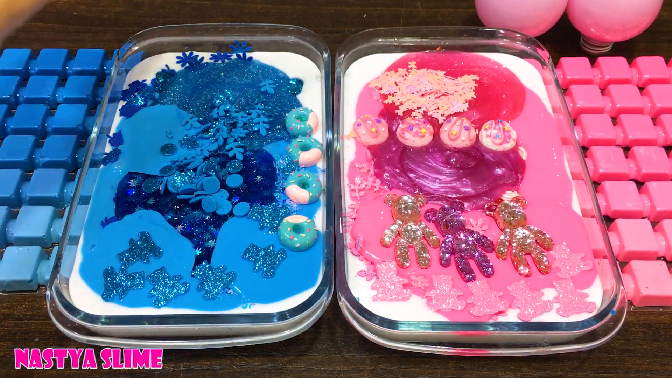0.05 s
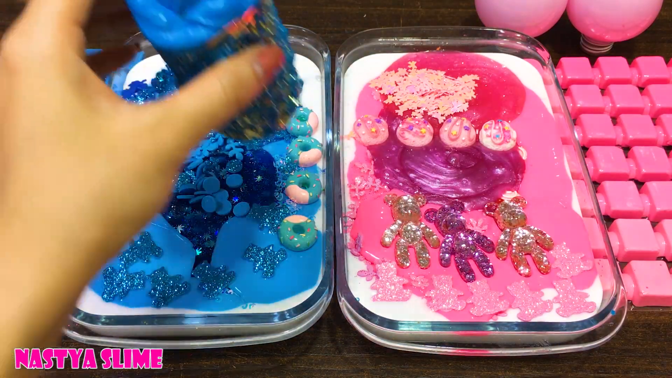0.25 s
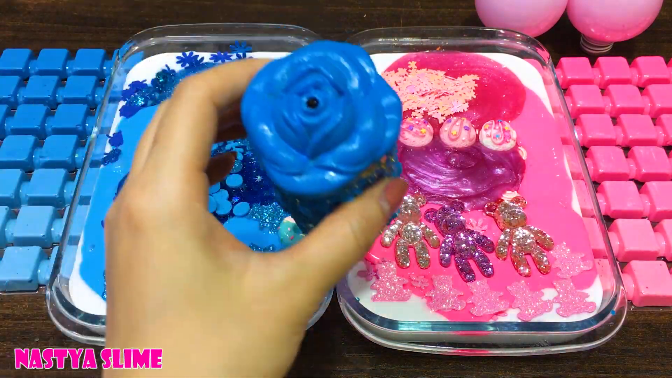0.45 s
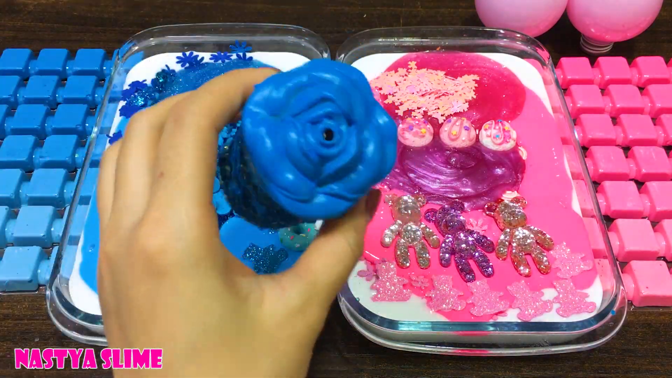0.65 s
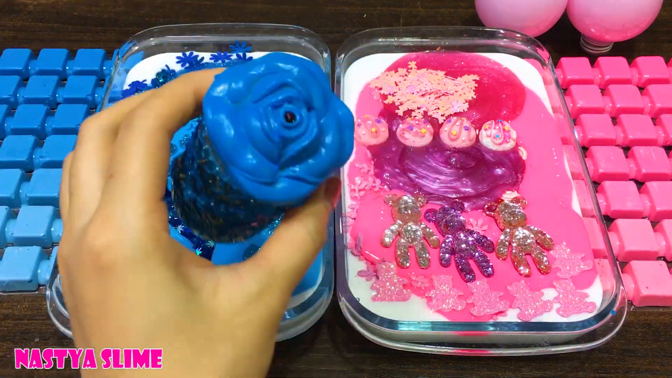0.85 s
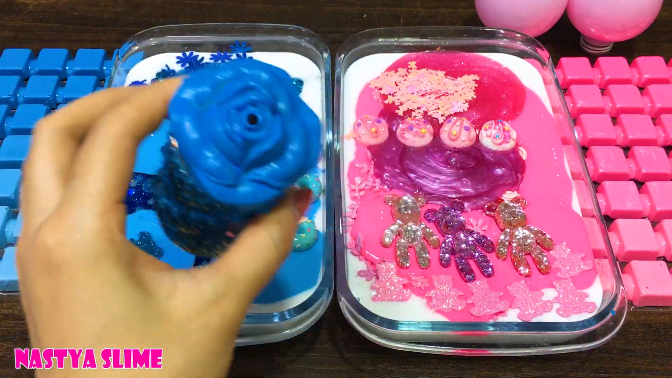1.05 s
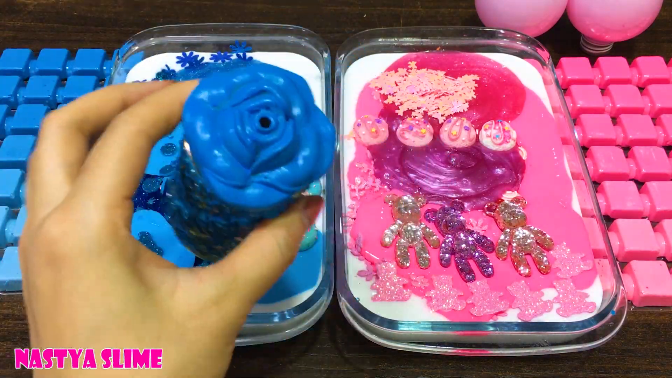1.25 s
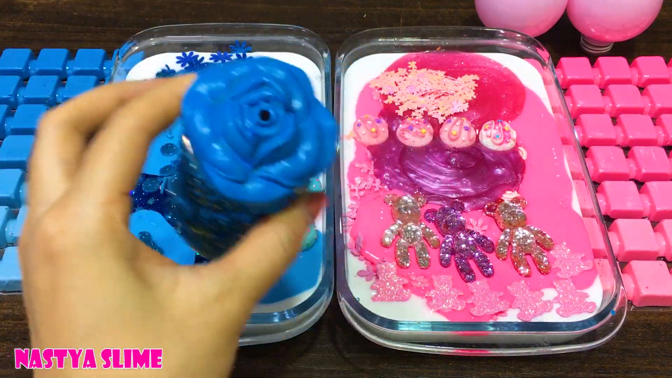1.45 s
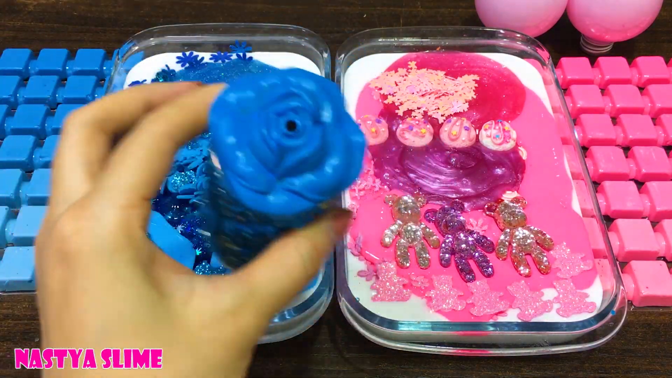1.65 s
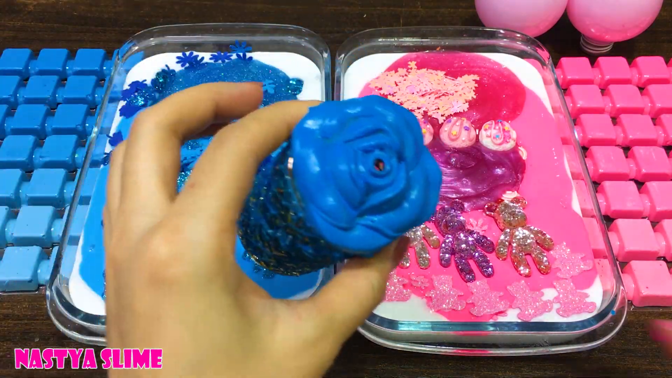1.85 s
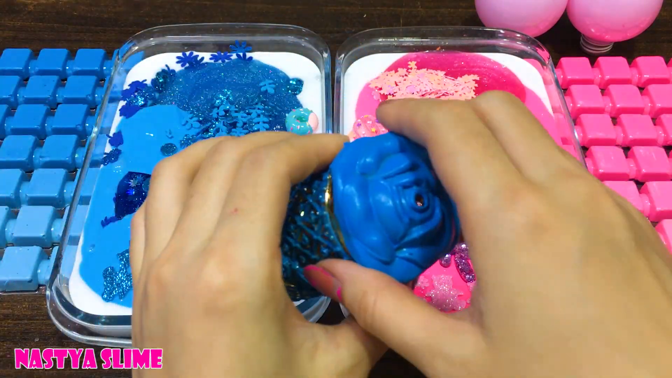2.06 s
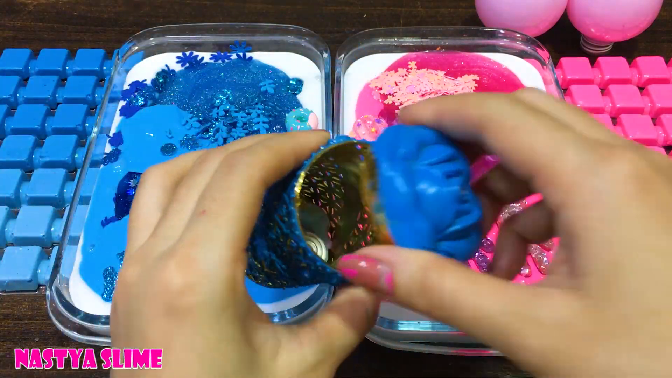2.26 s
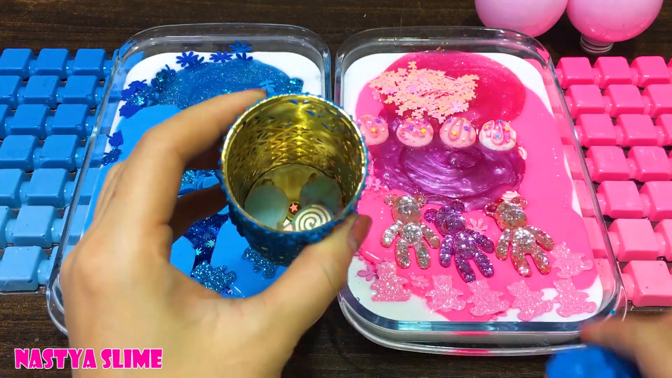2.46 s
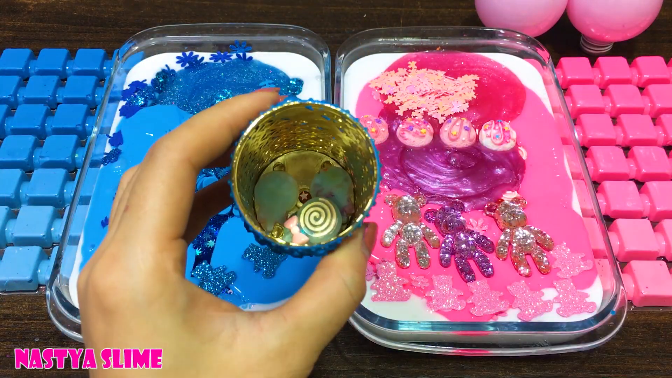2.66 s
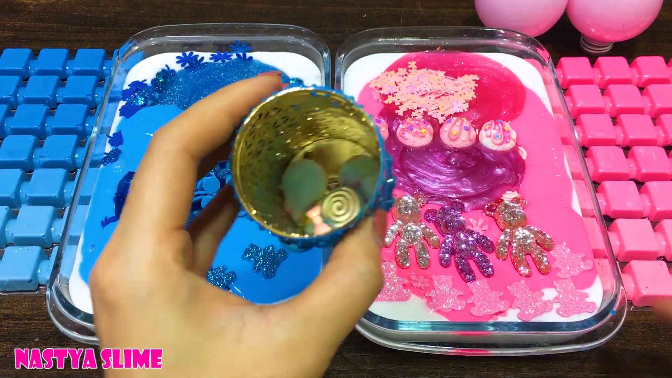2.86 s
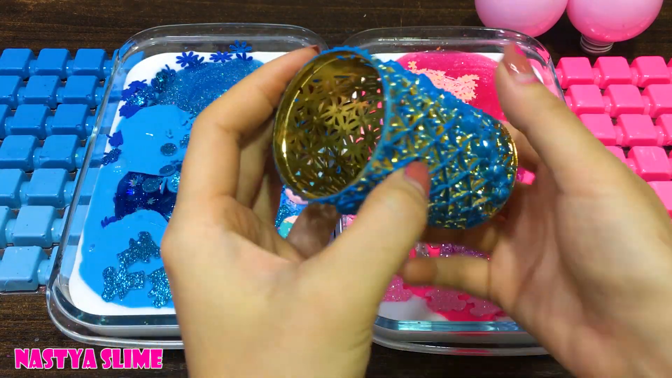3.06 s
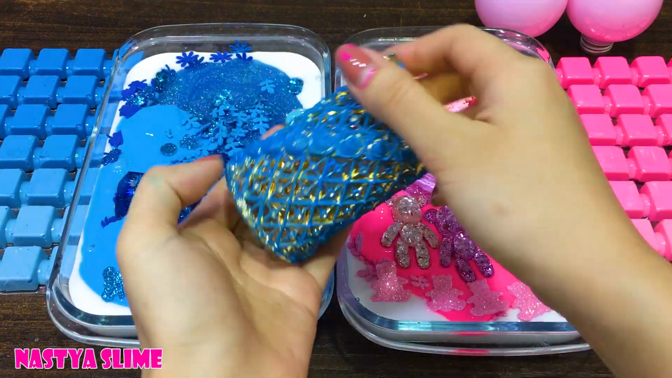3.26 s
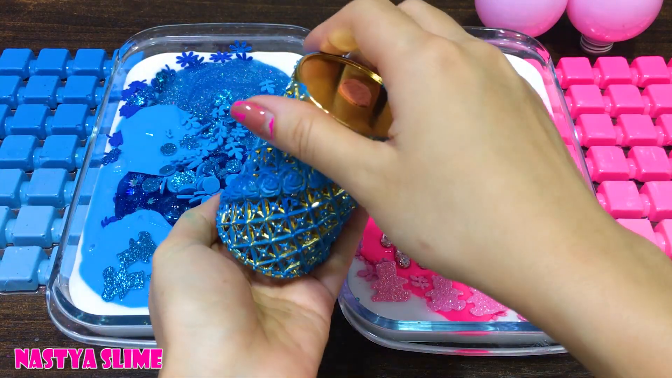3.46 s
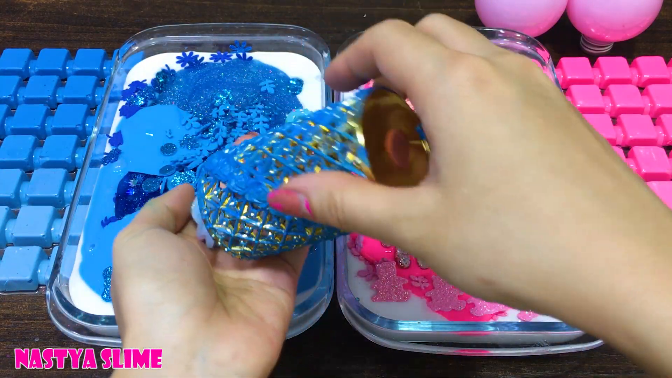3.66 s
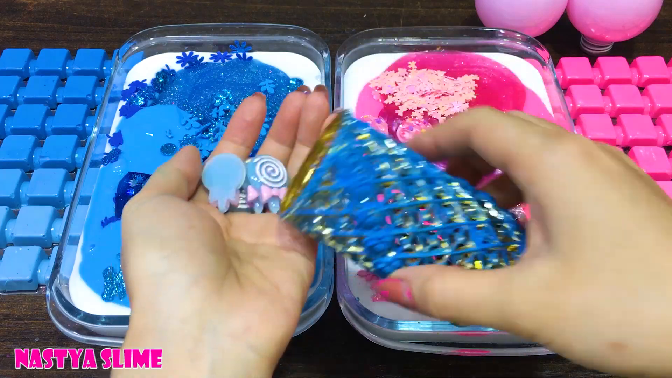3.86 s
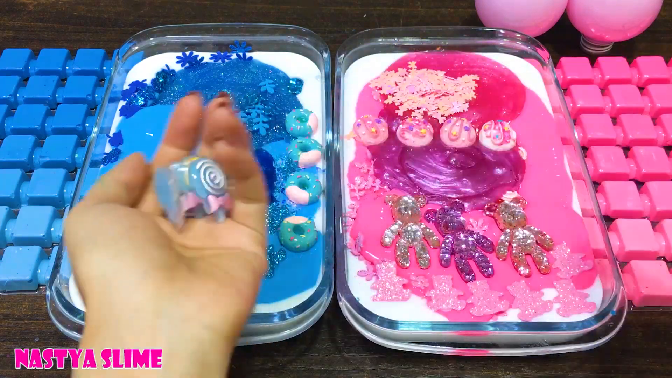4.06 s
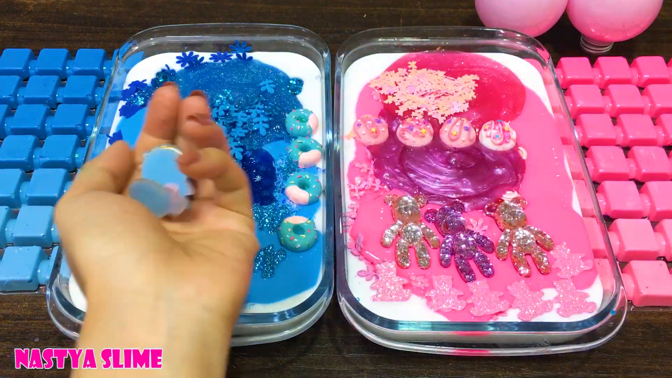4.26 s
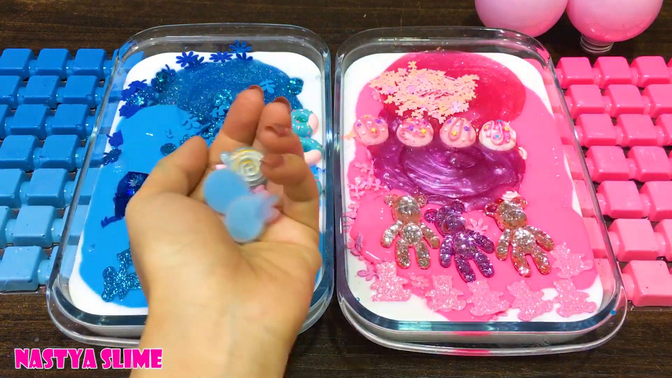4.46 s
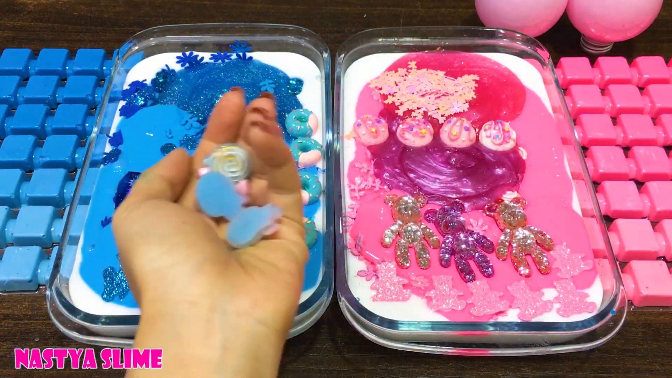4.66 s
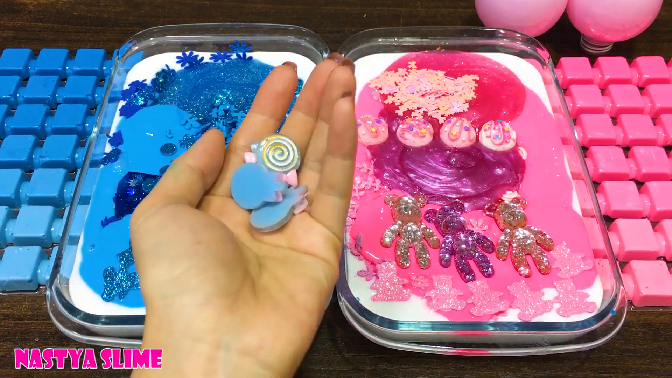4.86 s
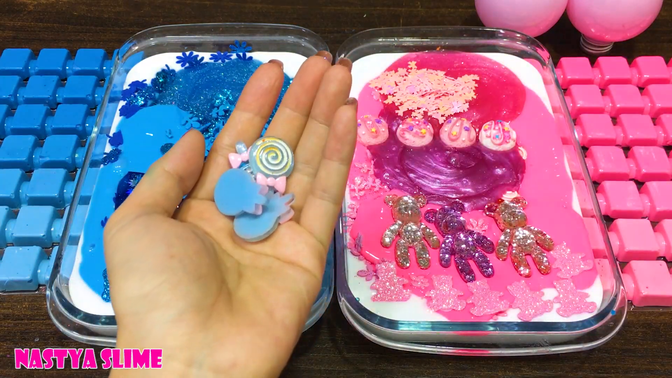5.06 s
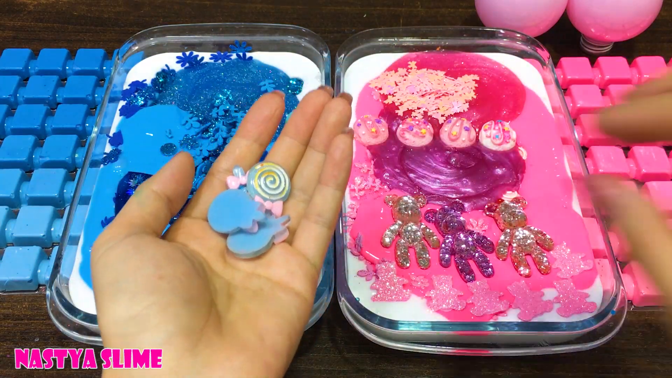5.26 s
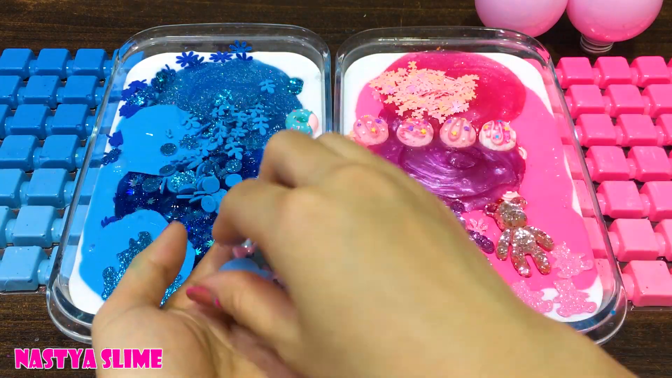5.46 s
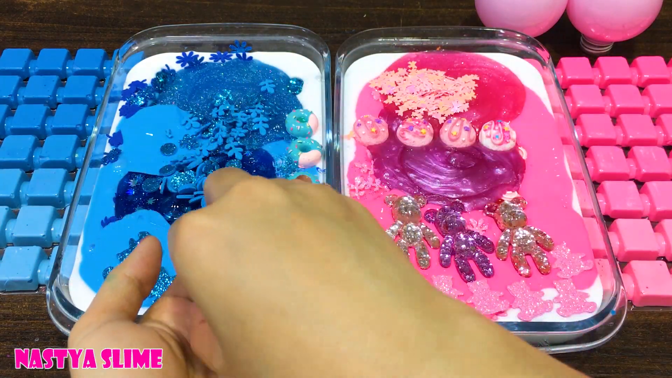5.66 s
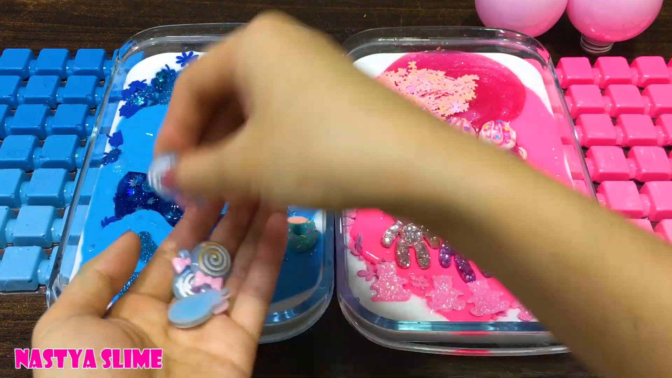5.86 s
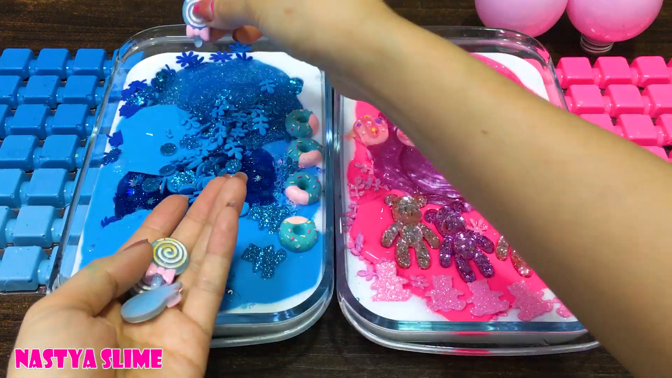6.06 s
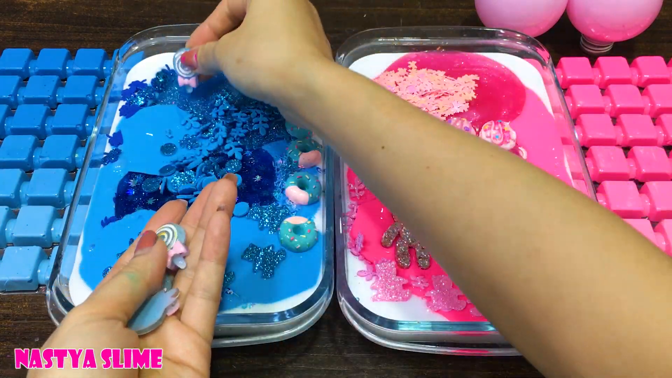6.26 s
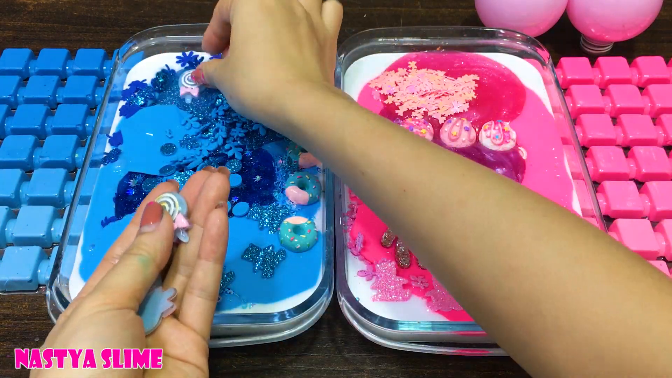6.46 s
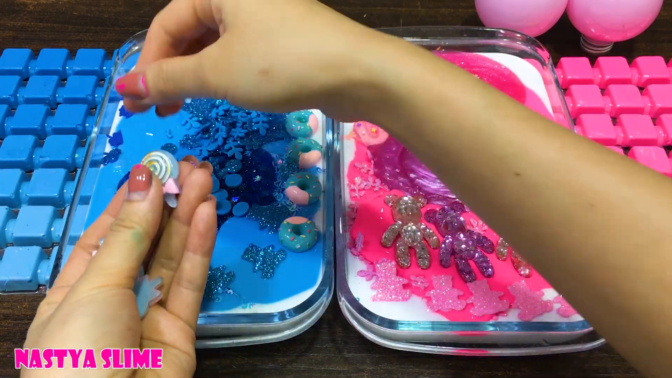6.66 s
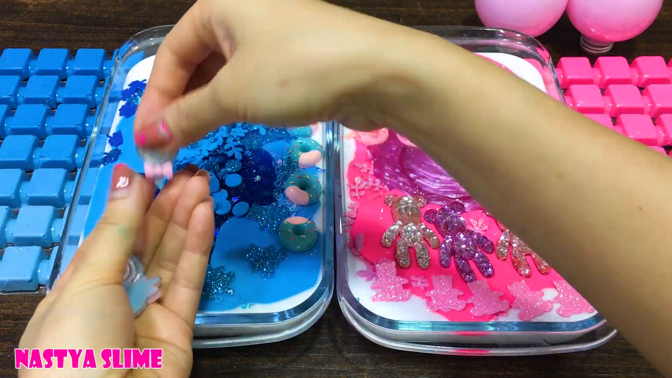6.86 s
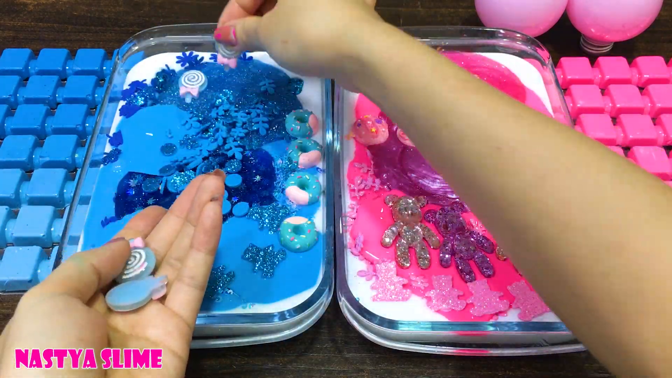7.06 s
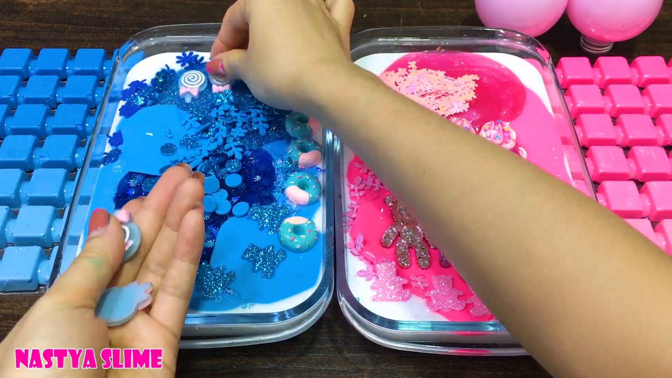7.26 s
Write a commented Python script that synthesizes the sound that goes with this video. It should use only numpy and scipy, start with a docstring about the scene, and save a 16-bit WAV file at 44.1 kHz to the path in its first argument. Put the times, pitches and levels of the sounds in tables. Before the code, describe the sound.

Brisk, hollow plastic shaking, a quiet lid removal, a few knocks, then crisp little charm clicks in a hand, fading to near-silent room noise.

```python
"""Small quiet room: a few plastic charms are shaken in a small lidded plastic cup, the lid comes off,
they are poured into a palm, jostled there and picked out one by one. Every collision rings the hollow cup,
its wall and the charms as decaying sines for a few milliseconds, with weak patter and dull thuds around it.
The room answers in shaped noise, over a low rumble and microphone hiss."""
import sys
import numpy as np
from scipy import signal
from scipy.fft import rfft, irfft
from scipy.io import wavfile

SR = 44100
rng = np.random.default_rng(int(sys.argv[2]) if len(sys.argv) > 2 else 0)


def pcm_store(signal):
    """Save signal as 16-bit PCM."""
    levels = np.round(np.clip(np.atleast_2d(signal), -1, 1) * 32767)
    wavfile.write(sys.argv[1], SR, levels.astype(np.int16).T)


N = 322900

# Background spectrum: (frequency [Hz], relative density [dB per Hz])
AIR_SPECTRUM = [(15, -56.5), (25, -22), (42, -15), (87, -2.5), (114, -10), (252, -19), (746, -28),
                (809, -27.5), (1550, -32), (2900, -32), (3700, -35.5), (5200, -33.5), (6500, -38.5),
                (7800, -33.5), (11500, -37), (13200, -40), (14800, -37.5), (16500, -48)]
# Swell of the rumble: (time [s], gain [dB])
RUMBLE_GAIN = [(0, 4), (.8, -2), (3.5, 0.5), (6.1, 2.5), (6.6, -5.5), (7.3, 1.9)]
# Clearest collisions: (time [s], peak of hollow knock [dB], peak of charm tick before its low cut [dB])
CLEAR_HITS = [(0.535, -39, -49), (0.5415, -34.5, -39.5), (0.58, -41.5, -47.5), (0.637, -38.5, -33.5),
              (0.6743, -29, -25), (0.9386, -48, -62.5), (1.0066, -25.5, -19.5), (1.0229, -26, -32.5),
              (1.035, -18.5, -16), (1.0771, -15, -20.5), (1.084, -29, -13), (1.0889, -8.5, -10.5),
              (1.106, -13.5, -19), (1.1098, -8.5, -11.5), (1.12, -10.5, -8.5), (1.125, -6.5, -4),
              (1.1399, -15, -14.5), (1.1464, -17, -22.5), (1.196, -14, -12.5), (1.198, -9.5, -14),
              (1.204, -16, -11), (1.2155, -5, -7.5), (1.2288, -13, -14), (1.2506, -21, -11.5),
              (1.267, -16, -17.5), (1.2884, -30.5, -8.5), (1.2957, -14, -10), (1.3024, -15, -17),
              (1.3114, -13.5, -9), (1.3685, -15, -9), (1.3833, -8.5, -3.5), (1.3942, -16, -6),
              (1.4012, -15, -9), (1.4177, -16, -21.5), (1.457, -17, -7.5), (1.4769, -10.5, -7.5),
              (1.5058, -15, -7), (1.515, -15.5, -18.5), (1.5273, -20.5, -5), (1.5465, -11.5, -32),
              (1.5687, -10, -13.5), (1.5806, -12.5, -10.5), (1.585, -13.5, -15), (1.592, -7.5, -4.5),
              (1.6079, -18.5, -8), (1.618, -16.5, -5), (1.6259, -10, -20.5), (1.642, -19, -10),
              (1.665, -15, -7.5), (1.694, -11, -8), (1.7394, -23.5, -26.5), (1.758, -3, -2),
              (1.7681, -10.5, -6), (1.8038, -14.5, -12.5), (1.8078, -15.5, -7), (1.8515, -12, -9.5),
              (1.8664, -13, -9.5), (1.8935, -19, -16.5), (1.9224, -24, -15), (1.939, -17, -17),
              (1.9554, -10, -11), (1.9705, -14, -4), (1.9794, -9.5, -10.5), (1.991, -9, -13),
              (1.9966, -11, -6.5), (2.0276, -18.5, -10.5), (2.0391, -13.5, -34), (2.0511, -9.5, -9),
              (2.058, -15.5, -7), (2.0686, -13.5, -26), (2.0749, -17.5, -12.5), (2.0819, -14.5, -22),
              (2.0944, -16, -14.5), (2.1236, -25.5, -34), (2.191, -28, -40), (2.1996, -32, -53),
              (2.2148, -43.5, -39), (2.3027, -38.5, -41), (2.315, -38.5, -49.5), (2.494, -45.5, -45.5),
              (2.5154, -37.5, -40.5), (2.5211, -37.5, -34.5), (2.828, -63.5, -45.5), (2.843, -51, -40.5),
              (2.9149, -51, -41), (2.9315, -15, -59.5), (2.9442, -30.5, -70.5), (2.9973, -28.5, -42),
              (3.048, -17, -32), (3.0742, -24.5, -54.5), (3.0983, -19, -44), (3.1161, -21, -39),
              (3.1362, -10.5, -17), (3.1532, -15, -50), (3.4372, -36.5, -29), (3.449, -19.5, -29),
              (3.4558, -36.5, -31.5), (3.4963, -21.5, -13.5), (3.5222, -25, -20), (3.547, -25, -3.5),
              (3.5683, -29, -18.5), (3.576, -38, -27.5), (3.5903, -26.5, -18), (3.61, -32, -20),
              (3.642, -40, -17), (3.662, -44, -19), (3.671, -31.5, -31), (3.6822, -39, -9.5),
              (3.696, -36, -10), (3.7145, -32, -21), (3.7337, -28.5, -6.5), (3.7581, -44, -0.5),
              (3.763, -48, -4.5), (3.7694, -60.5, -18), (3.7913, -56, -9), (3.8053, -65, -15.5),
              (3.8127, -59, -16), (4.2103, -58, -38), (4.2765, -53.5, -32.5), (4.3243, -49.5, -21),
              (4.3307, -44.5, -20), (4.389, -56.5, -28.5), (4.4053, -51, -16), (4.4128, -52, -44),
              (4.447, -69, -9.5), (4.4544, -77.5, -11), (4.459, -49.5, -5), (4.4722, -63.5, -21),
              (4.4766, -54.5, -8), (4.511, -44, -8.5), (4.5248, -46, -27), (4.5547, -51, -14.5),
              (4.5812, -59, -34), (4.5924, -58, -12.5), (4.5983, -49.5, 1.5), (4.6028, -73.5, -6.5),
              (4.6077, -55, -9), (4.625, -61, -16.5), (4.662, -62.5, -36), (4.6779, -60, -25),
              (4.7038, -66, -26), (4.7256, -55, -7.5), (4.7304, -56.5, -3.5), (4.733, -69, -3),
              (4.7383, -49, -10), (4.746, -47.5, -19), (4.767, -54, -11.5), (4.7864, -56.5, -27),
              (4.819, -45.5, -20.5), (4.8266, -69, -25), (4.847, -77, -40), (4.868, -60.5, -39),
              (4.8775, -53.5, -4.5), (4.8864, -54.5, -40), (4.8904, -103, -7.5), (4.8949, -77, -1),
              (4.9065, -73, -9), (4.988, -38, -37), (5.0264, -35, -2), (5.039, -53, -37),
              (5.047, -58, -10.5), (5.0523, -48, -20.5), (5.081, -44, -15), (5.089, -48, -18.5),
              (5.1153, -38, -24), (5.1277, -51, -27.5), (5.165, -40, -60), (5.2242, -57.5, -39),
              (5.6504, -51, -44.5), (5.8471, -55.5, -30), (5.864, -67, -23), (5.8681, -61, -36),
              (6.055, -52, -47), (6.0636, -51, -37), (6.0655, -49.5, -22), (6.153, -57, -37),
              (6.5104, -57.5, -34.5), (6.5434, -61.5, -25.5), (6.778, -54.5, -60.5)]
# Modes of the cavity, before pitch and scatter: (frequency [Hz], relative level [dB], t60 [s])
HOLLOW_MODES = [(1120, -23, .005), (1890, -12, 0.0053), (2320, -2.5, 0.014), (2770, -2, 0.0066),
                (2912, 0.5, 0.01), (3430, 2.5, 0.0058)]
# Modes of the cup wall, before pitch, tilt and scatter: (frequency [Hz], relative level [dB], t60 [s])
WALL_MODES = [(4400, -3, .005), (4680, -0.5, 0.0087), (4838, -1.5, 0.0065), (6065, 0, 0.0097)]
# Modes of the charms, before tilt and scatter: (frequency [Hz], relative level [dB], t60 [s])
CHARM_MODES = [(7200, -4, .0035), (8200, -2, .004), (9400, -3, .003), (10600, -2, .0035), (11700, -1, .004),
               (12700, -5, .003), (14500, -3, .004), (15400, -5, .003)]
# Grip and open mouth shift the hollow modes, free or damp the wall and tilt the treble:
# (time [s], pitch factor [ratio], wall gain [dB], mean treble tilt [dB per octave])
GRIP = [(.7, 0.83, 2.5, -13.5), (1.0, 0.96, -1.5, -8.5), (2.2, 1.002, -1, -6.5), (2.9, 0.62, -1.5, 2),
        (3.14, 0.74, 0.5, -12), (3.45, 1.09, 2.5, -17.5), (3.7, 0.87, -1.5, 6), (4.9, 1.02, 0.5, 3),
        (4.99, 0.66, -11, 8.5), (5.3, 0.62, 2, 2), (5.9, 0.84, 1, -0.5), (6.5, 0.62, -2.5, -30)]
# Handling that keeps the charms pattering:
# (start [s], end [s], base level of hollow knocks [dB], base level of charm ticks [dB])
HANDLING_SPELLS = [(0.531, 0.692, -63, -67), (1.009, 2.104, -34.5, -42), (2.097, 2.202, -49, -54),
                   (2.936, 3.19, -47, -67.5), (3.423, 3.787, -54, -57), (4.306, 4.973, -80, -64),
                   (4.99, 5.179, -50, -60)]
# Blows against fingers, palm and table: (time [s], peak [dB])
THUD_HITS = [(2.515, -41), (2.52, -39), (2.932, -40.5), (3.05, -41.5), (3.139, -40), (3.545, -42),
             (4.597, -55.5), (4.988, -48.5), (5.023, -39.5), (5.042, -38), (5.075, -43), (5.108, -46),
             (5.13, -32.5), (5.14, -40), (5.159, -40)]
# Modes of a thud, before pitch and scatter: (frequency [Hz], relative level [dB], t60 [s])
THUD_MODES = [(352.4, 6, 0.0062), (572, -7.5, 0.0019), (835, -3, 0.0218), (1057, -1.5, 0.0083)]

AIR_RMS_DB, RUMBLE_TOP_HZ = -61, 300
CHARM_CUT_HZ = 3100  # too small to radiate below this
CANDIDATES_PER_S, PATTER_FLOOR_DB = 650, -80  # candidates under the floor stay silent
SPELL_RISE_S, SPELL_FALL_DB_PER_S = .005, 499
# A clear collision knocks its neighbours loose: base patter level relative to it, and decay
SHOWER_HOLLOW_DB, SHOWER_CHARM_DB, SHOWER_T60_S = -19, -25, .12
# Energy of each reflection response relative to the dry sound, its decay and fade-in
NEAR_DB, NEAR_T60_S, NEAR_RISE_S = -12.5, 0.039, 0.0091
WALLS_DB, WALLS_T60_LOW_S, WALLS_T60_HIGH_S = -15.5, 0.25, .23
WALLS_RISE_S, WALLS_SPLIT_HZ = .009, 3500
DRIFT_CUT_HZ, SLOPE_HZ, TOP_HZ = 38, 15500, 16750


def undb(db):
    """Amplitude gain of a level in dB."""
    return 10 ** (np.asarray(db) / 20)


def curve(table, s):
    """Value columns of a table, interpolated at the times s."""
    rows = np.array(table, float)
    return [np.interp(s, rows[:, 0], column) for column in rows[:, 1:].T]


def air():
    """Microphone hiss over a rumble that swells and fades: noise shaped in frequency."""
    hz = np.maximum(np.arange(N // 2 + 1) * SR / N, 1)
    table_hz, table_db = np.array(AIR_SPECTRUM).T
    shape = undb(np.interp(np.log(hz), np.log(table_hz), table_db))
    spectrum = rfft(rng.standard_normal(N)) * shape
    rumble = irfft(spectrum * (hz < RUMBLE_TOP_HZ), N)
    hiss = irfft(spectrum * (hz >= RUMBLE_TOP_HZ), N)
    rumble_db = curve(RUMBLE_GAIN, np.arange(N) / SR)[0]
    x = hiss + rumble * undb(rumble_db)
    return x * undb(AIR_RMS_DB) / np.sqrt(np.mean(x ** 2))


def ring(s, peak_db, modes, pitch, tilt_db, detune, scatter_db, rise_s, size_samples):
    """Each blow starts all modes nearly in phase, with its own shares and tuning, and peaks at its level."""
    # axes: blow, mode, sample
    hz, db, t60_s = np.array(modes, np.float32).T[:, None, :, None]
    chance = rng.standard_normal((len(s), hz.size, 3), np.float32)
    t = np.arange(size_samples, dtype=np.float32) / SR
    tilt_db = np.float32(tilt_db).reshape(-1, 1, 1)
    pitch = np.float32(pitch).reshape(-1, 1, 1)
    db = db + tilt_db * np.log2(hz) + scatter_db * chance[..., 1:2]
    hz = hz * pitch * (1 + detune * chance[..., :1])
    phase = 2 * np.pi * hz * t + 0.7 * chance[..., 2:]
    wave = np.sum(undb(db) * undb(-60 * t / t60_s) * np.sin(phase), axis=1)
    wave = wave * (1 - np.exp(-t / rise_s))
    wave = wave * (undb(peak_db) / np.abs(wave).max(axis=1))[:, None]
    where = (s * SR).astype(int)[:, None] + np.arange(size_samples)
    return np.bincount(where.ravel(), wave.ravel(), N + size_samples)[:N]


def collisions(s, hollow_db, charm_db):
    """One contact excites cavity, wall and charm; the wall level mixes the other two."""
    pitch, grip_db, tilt_db = curve(GRIP, s)
    # treble tilt of wall and charm varies at random from contact to contact
    tilt_db = tilt_db + 3.5 * rng.standard_normal(len(s))
    wall_db = 0.62 * hollow_db + 0.4 * charm_db + grip_db
    wall_pitch = 0.96 * pitch ** .4
    hollow = ring(s, hollow_db, HOLLOW_MODES, pitch, 0,
                  detune=0.061, scatter_db=2, rise_s=0.0011, size_samples=900)
    wall = ring(s, wall_db, WALL_MODES, wall_pitch, tilt_db,
                detune=0.058, scatter_db=1, rise_s=0.00047, size_samples=500)
    charm = ring(s, charm_db, CHARM_MODES, 1, tilt_db,
                 detune=.033, scatter_db=4, rise_s=.0001, size_samples=300)
    charm = signal.sosfilt(signal.butter(2, CHARM_CUT_HZ, "high", fs=SR, output="sos"), charm)
    # the contact itself: a bare tick of one mode
    tick = ring(s, charm_db - 13, [(7540, 0, 0.0041)], 1, 0,
                detune=0.22, scatter_db=2, rise_s=.00003, size_samples=60)
    return hollow + wall + charm + tick


def stirring(s):
    """Base patter levels (hollow, charm) in dB at times s: handling power plus the shower after each hit."""
    start, end, *spell_db = np.array(HANDLING_SPELLS, float).T[:, :, None]
    rise = np.clip((s - start) / SPELL_RISE_S, 0, 1)
    held = rise * undb(-SPELL_FALL_DB_PER_S * np.maximum(s - end, 0))
    hit, *hit_db = np.array(CLEAR_HITS, float).T[:, :, None]
    fading = (s > hit) * undb(-60 * np.maximum(s - hit, 0) / SHOWER_T60_S)
    power = []
    for handling_db, blow_db, drop_db in zip(spell_db, hit_db, (SHOWER_HOLLOW_DB, SHOWER_CHARM_DB)):
        handling = np.sum((held * undb(handling_db)) ** 2, axis=0)
        shower = np.sum((fading * undb(blow_db + drop_db)) ** 2, axis=0)
        power.append(handling + shower)
    return 10 * np.log10(np.array(power) + 1e-12)


def patter():
    """Many weak contacts at random moments, a few much stronger than the rest."""
    chance = rng.random((int(CANDIDATES_PER_S * N / SR), 3))
    s = chance[:, 0] * N / SR
    hollow_db, charm_db = stirring(s)
    heard = np.maximum(hollow_db, charm_db) > PATTER_FLOOR_DB
    size_db = -3 + np.minimum(-4.2 * np.log(1 - chance[:, 1]), 15)
    lean_db = 14 * (chance[:, 2] - .5)  # towards hollow or charm
    hollow_db = hollow_db + size_db + lean_db
    charm_db = charm_db + size_db - lean_db
    return collisions(s[heard], hollow_db[heard], charm_db[heard])


def clear_hits():
    """Each clear collision chatters: two successively weaker rebounds, each 0.8 to 5 ms after the last."""
    s, hollow_db, charm_db = np.array(CLEAR_HITS, float).T
    chance = rng.random((len(s), 2, 2))
    delay_s = np.cumsum(.0008 + 0.0042 * chance[..., 0], axis=1)
    loss_db = np.cumsum(11 + 12 * chance[..., 1], axis=1)
    late_s = (s[:, None] + delay_s).ravel()
    late_hollow_db = (hollow_db[:, None] - loss_db).ravel()
    late_charm_db = (charm_db[:, None] - loss_db).ravel()
    rebounds = collisions(late_s, late_hollow_db, late_charm_db)
    return collisions(s, hollow_db, charm_db) + rebounds


def room(x):
    """Hands and table scatter briefly; the walls ring on longer, treble dying sooner. Both fade in over about 9
    ms."""
    t = np.arange(SR // 2) / SR
    noise, scatter = rng.standard_normal((2, len(t)))
    low = signal.sosfiltfilt(signal.butter(2, WALLS_SPLIT_HZ, fs=SR, output="sos"), noise)
    high = noise - low
    walls = low * undb(-60 * t / WALLS_T60_LOW_S) + high * undb(-60 * t / WALLS_T60_HIGH_S)
    walls = walls * np.clip(t / WALLS_RISE_S, 0, 1) ** 2
    near = scatter * undb(-60 * t / NEAR_T60_S)
    near = near * np.clip(t / NEAR_RISE_S, 0, 1)
    tail = undb(WALLS_DB) * walls / np.linalg.norm(walls)
    tail = tail + undb(NEAR_DB) * near / np.linalg.norm(near)
    return signal.fftconvolve(x, tail)[:N]


def thuds():
    """Soft flesh and the table answer low and briefly."""
    s, peak_db = np.array(THUD_HITS, float).T
    return ring(s, peak_db, THUD_MODES, 0.93, 0,
                detune=0.028, scatter_db=0.5, rise_s=0.00084, size_samples=1500)


def scene():
    """Charms, cup and thuds with the room's answer, over the background."""
    dry = clear_hits() + patter() + thuds()
    return (dry + room(dry) + air())[None]


def record(dry):
    """The recorder clips at full scale, drops subsonic drift, rolls off the treble and cuts the top."""
    x = np.clip(dry, -1, 1)
    x = signal.sosfilt(signal.butter(2, DRIFT_CUT_HZ, "high", fs=SR, output="sos"), x)
    x = signal.sosfiltfilt(signal.cheby1(3, .2, SLOPE_HZ, fs=SR, output="sos"), x)
    return signal.sosfiltfilt(signal.ellip(10, .1, 42, TOP_HZ, fs=SR, output="sos"), x)


dry = scene()
out = record(dry)
pcm_store(out)
```